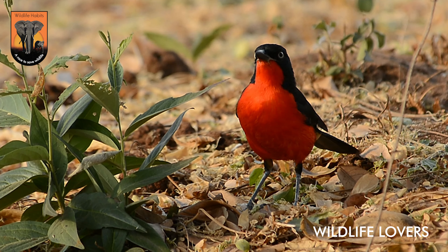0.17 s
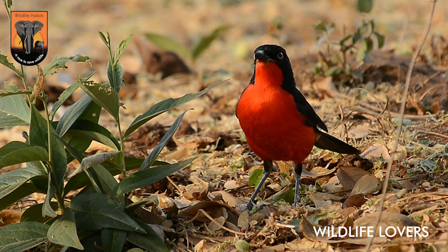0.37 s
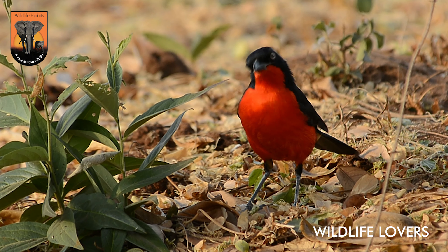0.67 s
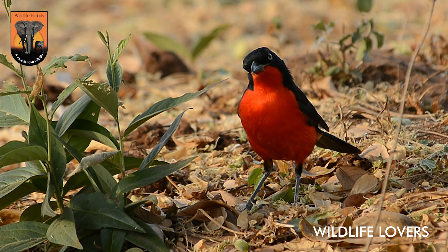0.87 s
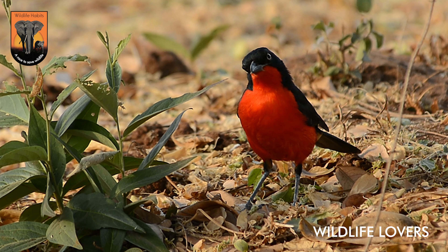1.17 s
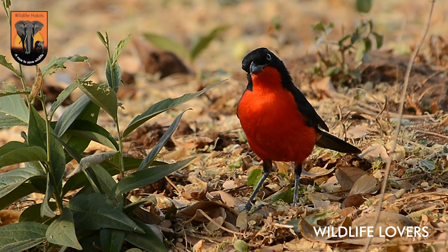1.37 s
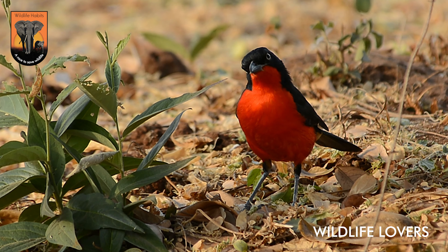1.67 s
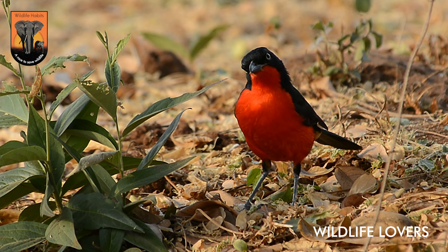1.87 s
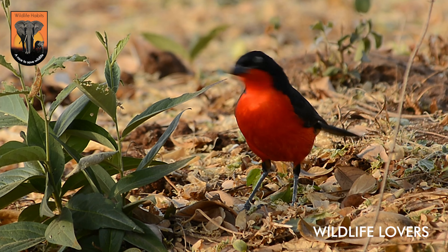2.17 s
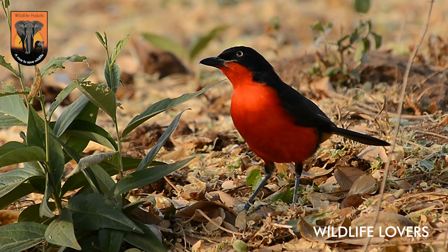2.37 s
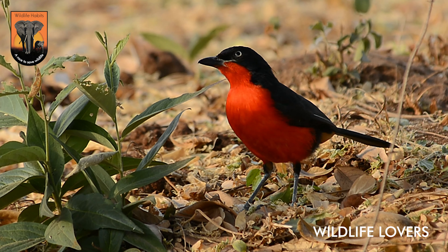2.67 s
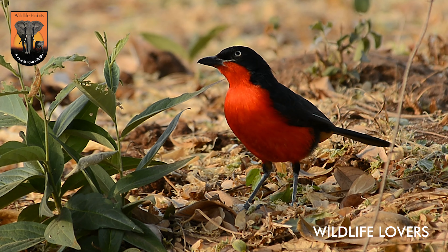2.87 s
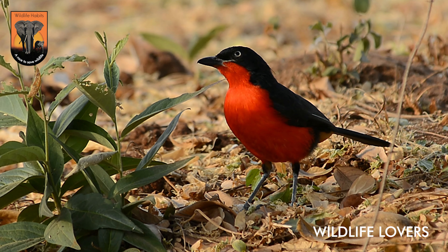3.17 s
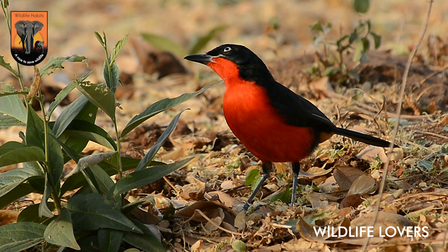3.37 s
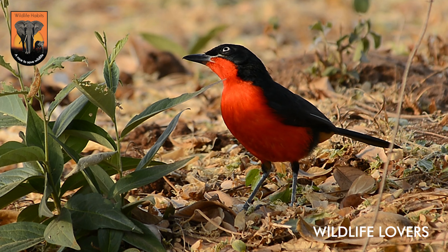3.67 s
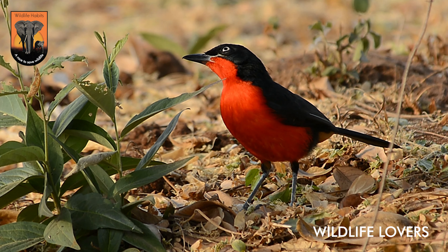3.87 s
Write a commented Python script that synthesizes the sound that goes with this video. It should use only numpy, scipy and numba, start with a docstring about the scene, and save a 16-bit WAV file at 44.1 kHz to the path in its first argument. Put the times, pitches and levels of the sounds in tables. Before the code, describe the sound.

Bush shrike pair duetting, fluid wavering whistles answered by tearing rasps, in quiet dry woodland

```python
"""Dry woodland: a pair of bush shrikes duets three times, the first call already under way at the start.
One bird gives a pure, wavering whistle (a gliding sine); its mate cuts in with a tearing rasp, made of
noise in throat resonances that mostly sink. Short gliding notes make far twitter and the pair's soft near
peeps, and filtered noise swishes softly like dry leaves. Ground and trees return short echoes over quiet
air noise, a hum and murmurs."""
import sys
import numpy as np
from scipy import signal
from scipy.fft import rfft, irfft
from scipy.io import wavfile
from scipy.ndimage import uniform_filter1d, map_coordinates
from numba import njit

SR = 44100
rng = np.random.default_rng(int(sys.argv[2]) if len(sys.argv) > 2 else 0)


def master_out(mix):
    """Clip the mix to full scale and print it as 16-bit PCM to the path in sys.argv[1]."""
    frames = np.transpose(np.atleast_2d(mix))
    ceiling = np.clip(frames, -1, 1)
    pcm = np.round(ceiling * 32767).astype(np.int16)
    wavfile.write(sys.argv[1], SR, pcm)


N = 176400  # samples: 4 seconds

# Pitch curve of each whistle, before the glide smoothing and waver: (time [s], pitch [Hz])
WHISTLE_CURVES = [
    [(0.0, 1537), (0.006, 1720), (0.014, 1794), (0.022, 1720), (0.034, 1539), (0.044, 1460)],
    [(3.18, 1084), (3.188, 989), (3.198, 968), (3.202, 1021), (3.218, 1530), (3.224, 1684), (3.234, 1654),
     (3.248, 1372), (3.258, 1315), (3.266, 1328), (3.276, 1649), (3.288, 1808), (3.3, 1854), (3.316, 1540),
     (3.328, 1610)],
    [(3.55, 1041), (3.56, 980), (3.572, 975), (3.576, 1057), (3.59, 1540), (3.598, 1567), (3.622, 1198),
     (3.634, 1228), (3.638, 1282), (3.646, 1594), (3.654, 1713), (3.666, 1732), (3.68, 1530), (3.687, 1465)],
]
# Extra strength of each whistle: (level [dB])
WHISTLE_STRENGTHS = [0.3, -0.63, 0.71]
# Brief dips and bumps in the whistle's level: (time [s], change [dB])
WHISTLE_CATCHES = [(3.2195, 1), (3.2456, -2), (3.263, -7), (3.587, -21), (3.605, -11), (3.617, 2.5)]
# Rasp calls: (start [s], length [s], level before the throat levels [dB], throat tuning [factor])
RASP_CALLS = [(-.03, 0.22, -35, 0.978), (3.255, 0.23, -35, 1.023), (3.64, 0.2, -35, 0.99)]
# Throat resonances before tuning and wander:
# (start pitch [Hz], end pitch [Hz], width [Hz], start level [dB], end level [dB])
THROAT_RESONANCES = [(1557, 1700, 515, -6, -8), (2480, 1834, 295, -6.5, -8), (2690, 2600, 1100, -12, -16),
                     (3870, 2760, 1450, -16.5, -27), (9460, 7100, 1100, -18.5, -35),
                     (8410, 7660, 1270, -14, -27), (13900, 15400, 1900, -22, -40),
                     (16000, 11200, 770, -31, -25), (6700, 10600, 8700, -19.5, -31.5)]
# Single short notes: far chirps, and the pair's soft near peeps at 2.807, 3.918 and 3.97 s:
# (start [s], length [s], start pitch [Hz], middle pitch [Hz], end pitch [Hz],
# level [dB], roughness [fraction of pitch], echo against the direct note [dB])
BIRD_NOTES = [(.695, 0.055, 1660, 1650, 1630, -61, .02, -3.5),
              (1.905, 0.054, 2826, 2500, 2500, -59.5, 0.058, 2.5),
              (1.94, 0.038, 2750, 4000, 4750, -56, .04, 4), (1.962, 0.045, 4800, 4780, 4730, -59, .006, -9),
              (2.088, 0.06, 4300, 3000, 2580, -52.5, .015, 1),
              (2.143, 0.028, 2600, 2800, 3166, -51.5, 0.034, 0),
              (2.25, 0.037, 5730, 5000, 4570, -55, 0.082, -4),
              (2.265, 0.077, 4600, 4640, 4600, -55, 0.121, -0.5),
              (2.807, .016, 2220, 2147, 2150, -50, .01, -8), (3.01, .07, 1330, 1164, 1030, -59, .02, -10),
              (3.125, 0.032, 1440, 1795, 1950, -58, .02, -8),
              (3.918, .026, 2590, 2450, 2310, -43, 0.023, -7),
              (3.97, 0.012, 2070, 2100, 2100, -48, .01, -9)]
# Far twittering phrases: (start [s], level [dB])
TWITTER_PHRASES = [(1.059, -56.5), (1.328, -55.5), (1.611, -56.5)]
# Notes inside each phrase: (delay [s], length [s], start pitch [Hz], middle pitch [Hz], end pitch [Hz],
# level against the phrase [dB])
TWITTER_SYLLABLES = [(0, 0.031, 3126, 2873, 2600, -0.5), (0.023, .04, 2640, 2945, 3570, -2),
                     (0.073, .03, 2700, 2400, 2600, -1.5), (.104, 0.0313, 2766, 3016, 3180, -0.5)]
# Leafy swishes: (centre [s], length [s], level [dB])
LEAF_SWISHES = [(0.422, 0.42, -53.5), (1.205, 0.41, -56), (2.09, 0.54, -55), (4.0, 0.28, -56.5)]
# Tone colour of the swishes, only the shape matters: (frequency [Hz], level [dB])
SWISH_COLOUR = [(1000, -16), (3000, -3.5), (4200, 0), (5200, 1.5), (7300, -1), (9000, -4.5), (12000, -7),
                (15500, -10.5)]
# Reflections of the pair from nearby: (delay [s], level [dB])
NEAR_REFLECTIONS = [(0.0131, -17.5), (.021, -20.5)]
# Tone colour of the background air, only the shape matters: (frequency [Hz], level [dB])
AIR_COLOUR = [(20, -12), (52, -9), (85, -19), (130, -11), (185, -5), (270, -11.5), (400, -7.5), (600, -6),
              (900, -8), (1600, -8.5), (2200, -12.5), (3300, -15.5), (6000, -19), (10000, -21),
              (15500, -23.5)]
# How alike left and right are in the air: (frequency [Hz], likeness [0-1])
AIR_STEREO_LIKENESS = [(60, 1), (250, 0.93), (600, 0.82), (1500, 0.75), (3000, 0.48), (6000, .2),
                       (15000, 0)]
# Low murmurs in the background: (centre [Hz], width [Hz], level [dB])
MURMURS = [(104.4, 21, -73), (520, 60, -65.5)]

# Whistle: level at the reference pitch, and how much louder it gets per octave above it
WHISTLE_DB, WHISTLE_REFERENCE_HZ, WHISTLE_DB_PER_OCTAVE = -24, 1700, 9.5
WHISTLE_ATTACK_S, WHISTLE_RELEASE_S, GLIDE_S, CATCH_S = 0.018, 0.018, 0.004, 0.002
WAVER = 0.0042  # fraction of pitch
# Faint overtones pass only a narrow throat resonance
OVERTONE_HZ, OVERTONE_WIDTH_HZ, OVERTONE_LEVEL_DB = 6900, 600, -36

# Rasp: its envelope, level flutter and the curve of the sinking
RASP_ATTACK_S, RASP_RELEASE_S, SINK_POWER = 0.0096, 0.055, 1.84
RASP_ROUGH_DB, RASP_FLUTTER_HZ = 0.5, 420
# Each resonance wanders (fraction of pitch) and swells on its own
THROAT_WANDER, THROAT_SWELL_DB, THROAT_WANDER_HZ = 0.022, 1.5, 60

# Small notes: roughness is a fraction of pitch
TWITTER_ROUGH, TWITTER_ECHO_DB, NOTE_FLUTTER_HZ, NOTE_T60_S = 0.055, 0.5, 1300, 0.31

# Echoes of the pair: the whistler is the nearer bird and stirs less echo
WHISTLE_ECHO_DB = -9
BUSH_DB, BUSH_T60_S = -5, 0.055
WOOD_DB, WOOD_T60_S, WOOD_TREBLE_T60_S = -9, 0.92, 0.82

# Background air and hum
AIR_DB, AIR_WANDER_DB = -55.5, 0.6
HUM_HZ, HUM_DB, HUM_WANDER_DB = 73.6, -72, 1.2

# Stereo: the pair reaches the left side first; balance is left minus right
LEFT_LEAD_S, BALANCE_DB = 0.000013, -1.0
TOP_HZ = 15650


def undb(db):
    """Turn decibels into a plain multiplier."""
    return 10 ** (np.asarray(db) / 20)


def unit(x):
    """Scale to an average strength (rms) of 1."""
    return x / (np.sqrt(np.mean(x ** 2)) + 1e-12)


def walk(rate):
    """Smooth random motion with a spread near 1, through `rate` random points per second."""
    points = rng.standard_normal(8192)
    return map_coordinates(points, [np.arange(N) / SR * rate], order=2, mode="wrap")


@njit
def moving_band_pass(x, hz, width):
    """Let through a band of `width` Hz around a centre that may move, using two feedback stores."""
    y, band, low = np.empty(len(x)), 0., 0.
    for i in range(len(x)):
        g = np.tan(np.pi * hz[i] / SR)
        k = np.pi * width / SR * (1 + g * g) / g  # damping that sets the width
        v = (band + g * (x[i] - low)) / (1 + g * (g + k))
        band, low, y[i] = 2 * v - band, low + 2 * g * v, k * v
    return y


def resonance(hz, width):
    """Rushing-air noise through a steep resonance (two band-passes in a row), rms 1."""
    hz = np.clip(hz, 20., .45 * SR)
    noise = rng.standard_normal(N)[:len(hz)]
    once = moving_band_pass(noise, hz, float(width))
    return unit(moving_band_pass(once, hz, float(width)))


def on_bins(points):
    """Spread (Hz, value) points over the spectrum, evenly in pitch between points."""
    hz, value = np.array(points).T
    bin_hz = np.arange(N // 2 + 1) * SR / N
    return np.interp(np.log(bin_hz + 1e-3), np.log(hz), value)


def stereo_noise(colour, likeness):
    """Coloured noise, partly shared by left and right, rms 1."""
    c = np.clip(likeness, 0, 1)
    mid, side = rfft(rng.standard_normal((2, N))) * undb(on_bins(colour))
    opposite = np.array([[1], [-1]])
    return unit(irfft(mid * np.sqrt(1 + c) + opposite * side * np.sqrt(1 - c), N))


def scatter(x, t60, treble_t60, likeness, split_hz=4000):
    """Diffuse echo from fading noise; the treble has its own fade and differs between the ears."""
    t = np.arange(SR) / SR
    shared, own = rng.standard_normal(SR), rng.standard_normal((2, SR))
    c = np.clip(likeness, 0, 1)
    low_pass = signal.butter(2, split_hz, fs=SR, output="sos")
    high_pass = signal.butter(2, split_hz, "high", fs=SR, output="sos")
    low = signal.sosfilt(low_pass, np.sqrt(c) * shared + np.sqrt(1 - c) * own)
    high = signal.sosfilt(high_pass, own)
    onset = 1 - np.exp(-t / 0.012)
    # T60 is the time to fade by 60 dB, a factor of 1000
    slow, fast = (onset * np.exp(-np.log(1000) * t / d) for d in (t60, treble_t60))
    echo = (low * slow + high * fast) / np.sqrt(np.sum(slow ** 2))
    return signal.fftconvolve(x[None], echo, axes=1)[:, :N]


def whistler():
    """A nearly pure tone that swings up and down, louder as it climbs, with a trace of overtones."""
    t, out = np.arange(N) / SR, np.zeros(N)
    waver = 1 + WAVER * walk(200)
    catches = sum(db * np.exp(-((t - s) / CATCH_S) ** 2) for s, db in WHISTLE_CATCHES)
    throat_hz = np.full(N, float(OVERTONE_HZ))
    for curve, gain_db in zip(WHISTLE_CURVES, WHISTLE_STRENGTHS):
        s, hz = np.array(curve).T
        glide = uniform_filter1d(np.interp(t, s, hz), max(1, int(GLIDE_S * SR)))
        pitch = glide * waver
        phase = 2 * np.pi * np.cumsum(pitch) / SR
        # the first whistle is already under way
        onset = s[0] if s[0] > WHISTLE_ATTACK_S else -WHISTLE_ATTACK_S
        rise = (t - onset + GLIDE_S) / WHISTLE_ATTACK_S
        fall = (s[-1] + GLIDE_S - t) / WHISTLE_RELEASE_S
        gate = np.clip(np.minimum(rise, fall), 0, 1)
        overtones = sum(np.sin(k * phase) for k in range(4, 7))
        narrowed = moving_band_pass(overtones, throat_hz, float(OVERTONE_WIDTH_HZ))
        tone = np.sin(phase) + undb(OVERTONE_LEVEL_DB) * narrowed
        climb_db = WHISTLE_DB_PER_OCTAVE * np.log2(pitch / WHISTLE_REFERENCE_HZ)
        out += np.sqrt(2) * tone * gate * undb(WHISTLE_DB + catches + gain_db + climb_db)
    return out


def rasper():
    """Chaotic, fluttering airflow in throat resonances that mostly sink as the call runs out."""
    t, out = np.arange(N) / SR, np.zeros(N)
    motion = [(1 + THROAT_WANDER * walk(THROAT_WANDER_HZ), THROAT_SWELL_DB * walk(THROAT_WANDER_HZ))
              for _ in THROAT_RESONANCES]
    for start, length, db, tuning in RASP_CALLS:
        on = (t > start) & (t < start + length + RASP_RELEASE_S / 2)
        age = t[on] - start
        sink = np.minimum(age / length, 1) ** SINK_POWER
        fall = (length - age) / RASP_RELEASE_S + .5
        envelope = np.clip(np.minimum(age / RASP_ATTACK_S, fall), 0, 1)
        for (hz0, hz1, width, db0, db1), (wander, swell) in zip(THROAT_RESONANCES, motion):
            hz = tuning * (hz0 + (hz1 - hz0) * sink) * wander[on]
            level = db + db0 + (db1 - db0) * sink + swell[on]
            out[on] += resonance(hz, width) * envelope * undb(level)
    return out * undb(RASP_ROUGH_DB * walk(RASP_FLUTTER_HZ))


def small_notes():
    """Short gliding sine notes, clear or buzzy, with more or less echo."""
    t, direct, sent = np.arange(N) / SR, np.zeros(N), np.zeros(N)
    twitters = [(s + delay, length, first, middle, last, db + rel, TWITTER_ROUGH, TWITTER_ECHO_DB)
                for s, db in TWITTER_PHRASES
                for delay, length, first, middle, last, rel in TWITTER_SYLLABLES]
    flutter, grain = walk(NOTE_FLUTTER_HZ), undb(2.0 * walk(180))
    for start, length, first, middle, last, db, rough, echo_db in list(BIRD_NOTES) + twitters:
        on = (t > start) & (t < start + length)
        u = (t[on] - start) / length  # 0 to 1 through the note
        bend = np.polyfit([0, .5, 1], [first, middle, last], 2)
        hz = np.polyval(bend, u) * (1 + rough * flutter[on])
        swell = np.sqrt(2 * np.sin(np.pi * u))
        note = swell * undb(db) * grain[on] * np.sin(2 * np.pi * np.cumsum(hz) / SR)
        direct[on] += note
        sent[on] += undb(echo_db) * note
    return direct + scatter(sent, NOTE_T60_S, NOTE_T60_S, likeness=0.8)


def swishes():
    """Soft swells of hiss, as of dry leaves brushed together."""
    t = np.arange(N) / SR
    swell = sum(undb(db) * np.cos(np.pi * np.clip((t - s) / length, -.5, .5))
                for s, length, db in LEAF_SWISHES)
    return stereo_noise(SWISH_COLOUR, likeness=0.5) * swell * undb(0.27 * walk(40))


def background():
    """Still air as coloured noise, with a faint wandering hum and low murmurs of narrow noise."""
    air = stereo_noise(AIR_COLOUR, on_bins(AIR_STEREO_LIKENESS))
    air = air * undb(AIR_DB + AIR_WANDER_DB * walk(6.9))
    hum_level = np.sqrt(2) * undb(HUM_DB + HUM_WANDER_DB * walk(4))
    hum_pitch = HUM_HZ * (1 + 0.011 * walk(4.44))
    hum = hum_level * np.sin(2 * np.pi * np.cumsum(hum_pitch) / SR)
    murmurs = sum(undb(db) * resonance(np.full(N, float(hz)), width) for hz, width, db in MURMURS)
    return air + hum + murmurs


def scene():
    """The duet with its echoes, over the small notes, the swishes and the background."""
    t = np.arange(N) / SR
    whistle, rasp = whistler(), rasper()
    pair = whistle + rasp
    echoing = undb(WHISTLE_ECHO_DB) * whistle + rasp
    near = pair + sum(undb(db) * np.interp(t - delay, t, pair, left=0) for delay, db in NEAR_REFLECTIONS)
    # turning the phase of each frequency delays the right side by less than a sample
    hz = np.arange(N + 1) / (2 * N) * SR
    right = irfft(rfft(near, 2 * N) * np.exp(-2j * np.pi * hz * LEFT_LEAD_S))[:N]
    bushes = undb(BUSH_DB) * scatter(echoing, BUSH_T60_S, BUSH_T60_S, likeness=0.95)
    wood = undb(WOOD_DB) * scatter(echoing, WOOD_T60_S, WOOD_TREBLE_T60_S, likeness=0.99)
    mix = np.array([near, right]) + bushes + wood + small_notes() + swishes() + background()
    return mix * undb(np.array([[BALANCE_DB], [-BALANCE_DB]]) / 2)


def record(dry):
    """A steep low-pass filter removes the very top of the treble."""
    return signal.sosfilt(signal.ellip(10, .2, 70, TOP_HZ, fs=SR, output="sos"), dry)


dry = scene()
out = record(dry)
master_out(out)
```